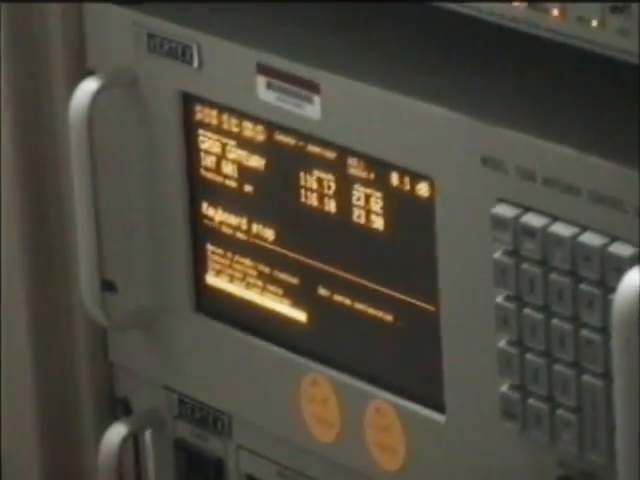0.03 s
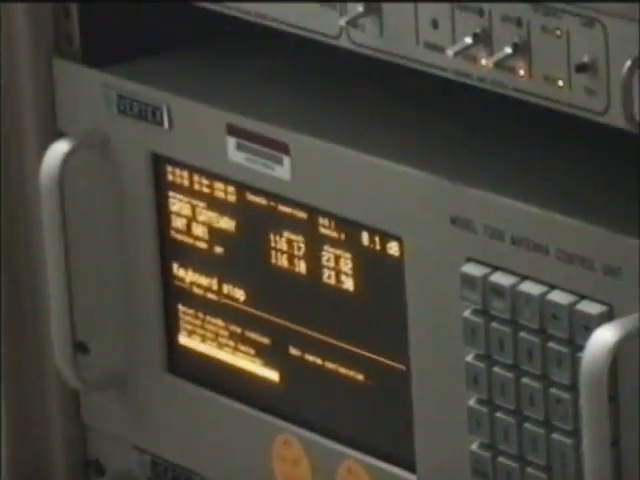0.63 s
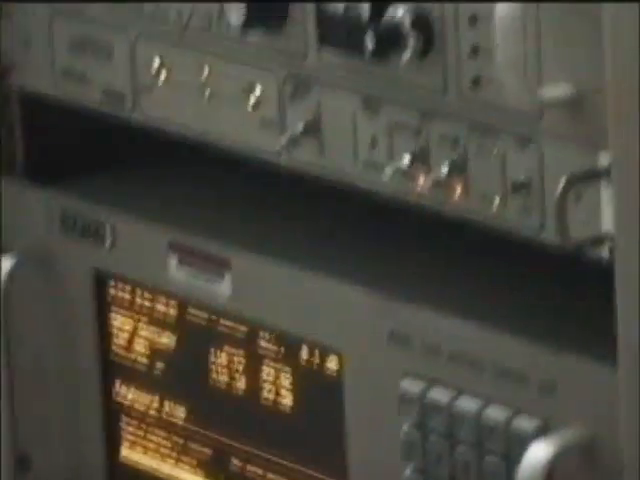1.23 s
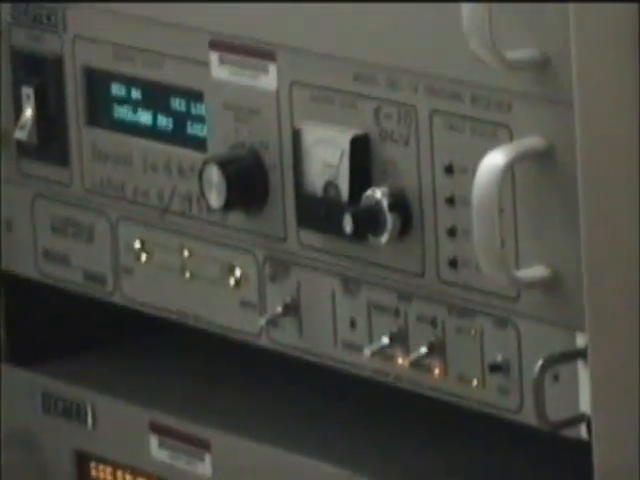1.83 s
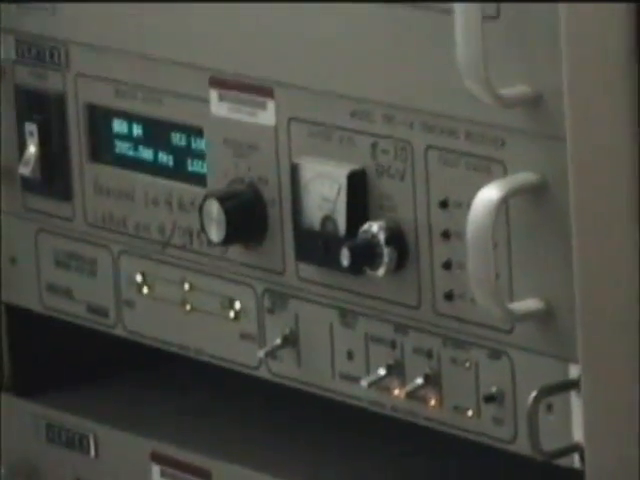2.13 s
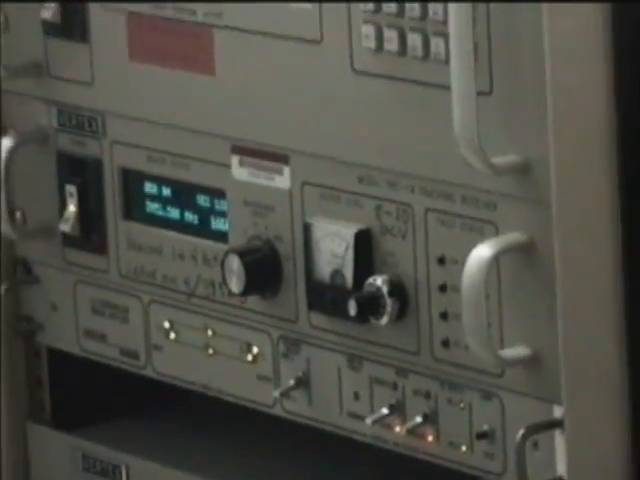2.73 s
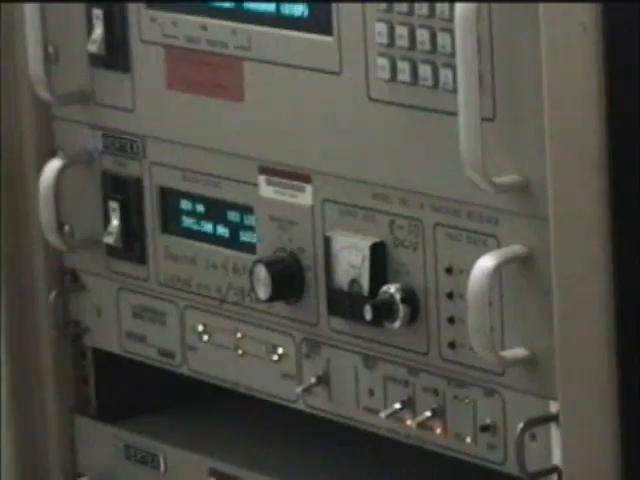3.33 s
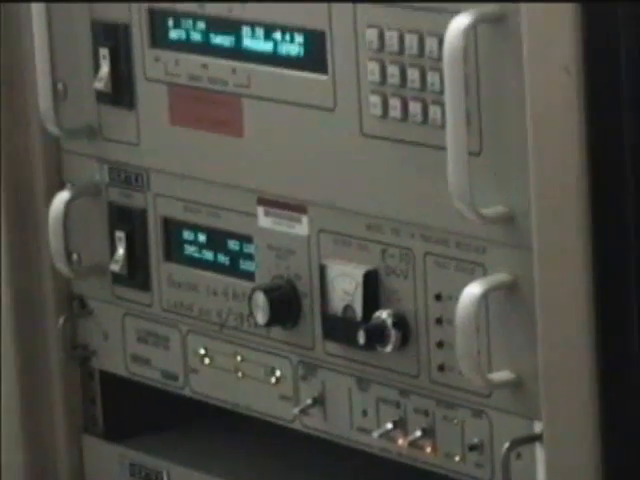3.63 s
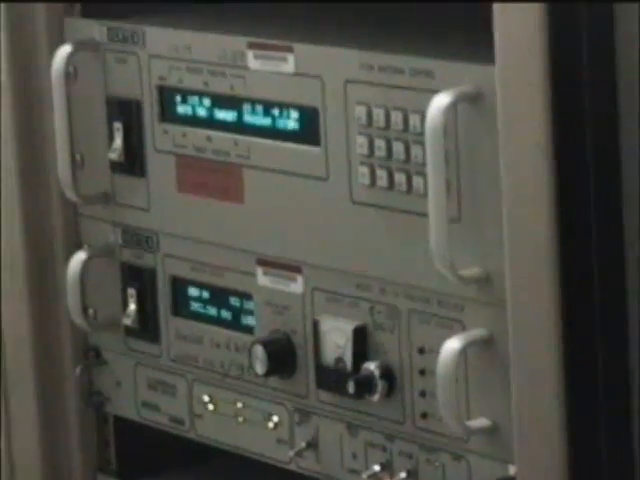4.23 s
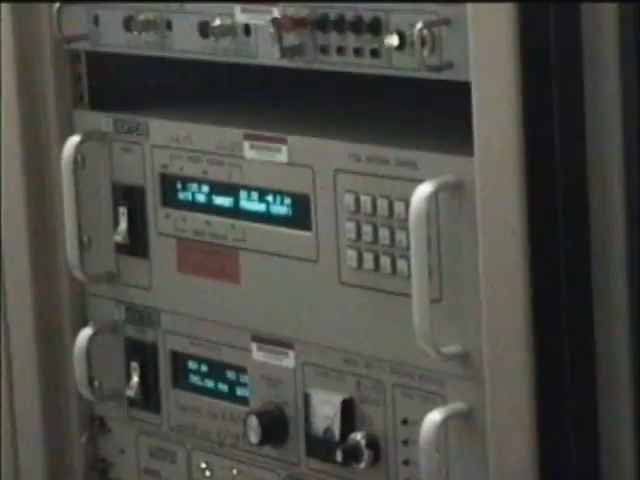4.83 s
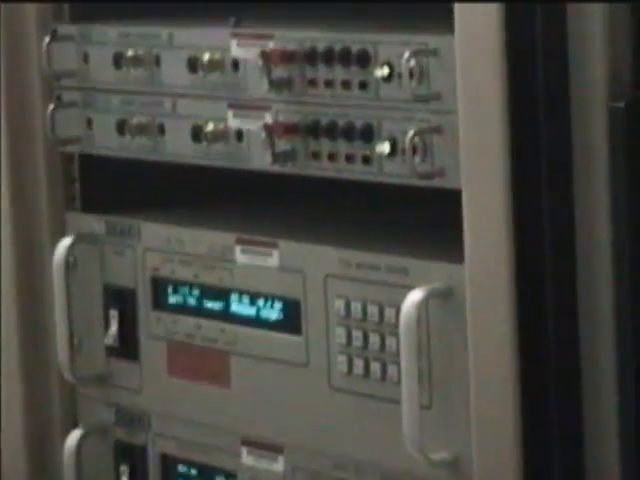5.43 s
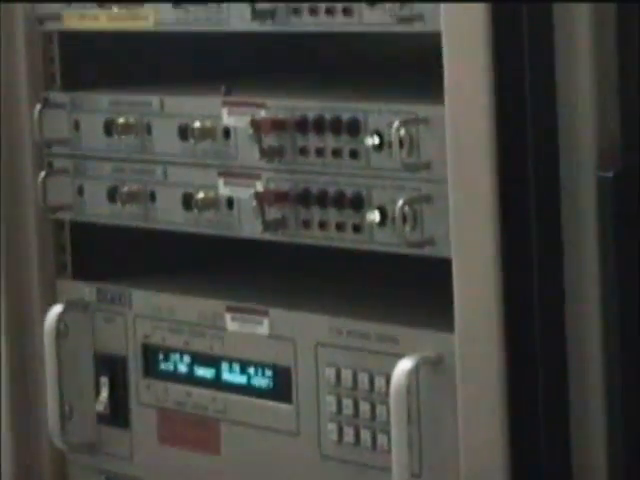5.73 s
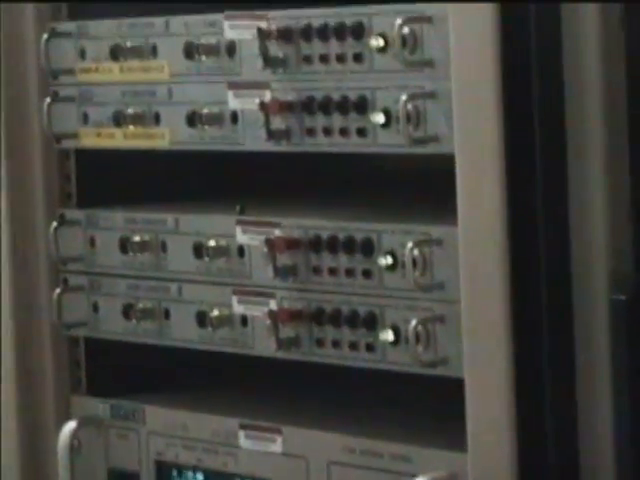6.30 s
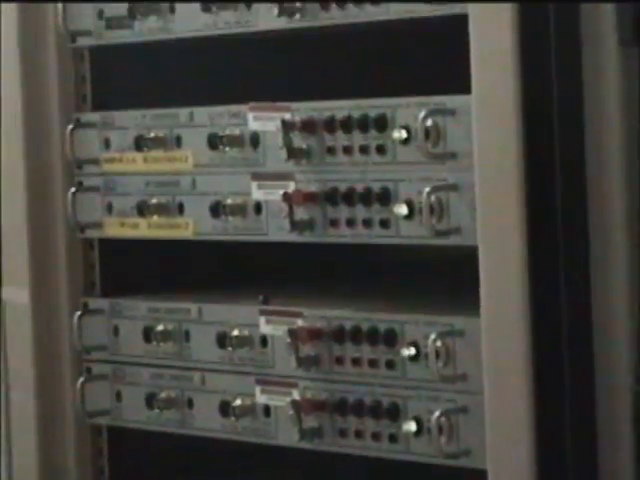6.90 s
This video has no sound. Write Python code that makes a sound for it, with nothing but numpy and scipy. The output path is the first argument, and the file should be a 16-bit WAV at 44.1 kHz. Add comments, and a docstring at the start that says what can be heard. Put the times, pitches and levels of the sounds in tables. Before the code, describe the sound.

From start to finish, about seven seconds, cooling fans in electronic equipment racks make a steady roar of air, heard in stereo from close by in a small room. Two low fan tones stand out, wavering and briefly dipping as they beat against neighbouring fans. An electrical hum and weaker, more distant fan tones blend in. The vents hiss with a slight pulse. The low roar swells briefly around 1, 1.6, 2.6 and 4 to 5 seconds. A thin, very high whistle flickers faintly on the left, clearest in the first 1.5 seconds and again after 6, with a barely audible power supply whine beside it. A fan bearing gives tiny high squeaks at about 1.3, 6.2 and 6.9 seconds. A mid-pitched fan overtone grows a little toward the end, while the overall level stays even.

```python
"""Equipment racks in a small room

A hand-held camera pans up the rack fronts, its stereo microphone close to the cooling fans.
Many fans turn at nearly the same speed: two blade tones stand out and beat with their neighbours.
Transformers hum on mains harmonics, air roars through the cabinets, hisses and whistles thinly
at the vents. Far behind, power supplies whine and a fan bearing squeaks."""
import sys
import numpy as np
from scipy.fft import rfft, irfft, next_fast_len
from scipy.io import wavfile
from scipy.ndimage import map_coordinates

SR = 44100
rng = np.random.default_rng(int(sys.argv[2]) if len(sys.argv) > 2 else 0)


def inscribe(sig):
    """Save sig as 16-bit PCM at rate SR to the path in sys.argv[1].

    A 1-D sig is mono; a 2-D sig holds one channel per row.
    Samples are clipped to [-1, 1] before scaling.
    """
    pcm = np.round(np.clip(np.atleast_2d(sig).T, -1, 1) * 32767)
    wavfile.write(sys.argv[1], SR, pcm.astype(np.int16))


N = 311346
TIME = np.arange(N) / SR

# Fans beside the low and the high near fan. Each row: offset from the blade tone in Hz, a moment
# in step at the left and at the right in seconds, relative level left and right in dB.
LOW_FAN_NEIGHBOURS = [(-1.651, .596, .033, -9.3, -13.8), (1.306, .41, .484, -26, -12),
                      (2.468, .263, .403, -34, -16), (3.679, .193, .16, -22.4, -16),
                      (4.132, .068, .22, -23.7, -13), (9.573, .024, .03, -27, -19)]
HIGH_FAN_NEIGHBOURS = [(-1.208, .375, .21, -12.5, -4.3)]
# Brief dips and lifts of each blade tone at the microphone.
# Each row: centre in seconds, half-width in seconds, change left and right in dB.
LOW_FAN_SWINGS = [(.05, .03, 2, 4), (.28, .03, -11, -6), (.38, .02, -8, 0), (.47, .05, 1, 2),
                  (.595, .03, -3, -9), (.67, .04, 2, 0), (1.06, .04, -1, -4), (1.22, .08, -1, -1.5),
                  (1.39, .03, -3, -4), (1.49, .04, 2, 2), (1.6, .03, 0, -12), (2.12, .08, 2, 2),
                  (2.3, .04, 0, -6), (2.45, .08, 1, 1), (2.89, .02, -6, 0), (3.11, .05, 3, 4),
                  (3.22, .025, 0, -10), (3.5, .03, 0, -11), (3.85, .04, 0, -4), (4.53, .06, -7, -2),
                  (4.78, .06, 2, 3), (4.96, .04, 2, 4), (5.05, .05, -3, 0), (5.35, .03, 3, 1),
                  (5.72, .022, -7, -3), (5.815, .02, -7, -5), (6.19, .04, -2, 0), (6.31, .045, -14, -12),
                  (6.58, .06, 2, 1)]
HIGH_FAN_SWINGS = [(.23, .05, 2, 2), (.37, .03, 3, 2), (.6, .04, 0, -4), (.82, .025, -3, -4),
                   (.92, .03, -9, -3), (2.44, .035, -6, 0), (3.15, .03, -2, -7), (4.09, .04, -4, 0),
                   (6.3, .07, 2, 0)]
# Both near fans speed up slightly. Each row: time in seconds, relative speed.
FAN_SPEED = [(0, .9979), (2, .9977), (3.4, 1.0002), (7.06, 1.0004)]
def near_fans(low_hz=280.45, high_hz=351.5, low_db=-29.5, high_db=-31.5):
    """Close to the microphone, two fans on one supply chop the air about a major third apart."""
    speed, = curves(FAN_SPEED)
    low_beat = beating(LOW_FAN_NEIGHBOURS) * swinging(LOW_FAN_SWINGS)
    high_beat = beating(HIGH_FAN_NEIGHBOURS) * swinging(HIGH_FAN_SWINGS)
    low = tone(low_hz * speed, pan_db=1.5, lead=-.1, drift=.00018, scatter=(.04, .06), beat=low_beat)
    high = tone(high_hz * speed, pan_db=3.5, lead=-.95, drift=.00021, scatter=(.03, .04), beat=high_beat)
    low_gain = amp(low_db + .5 * wobble(16))
    high_gain = amp(high_db + .73 * wobble(22)) * climb(rise_db=2)
    return low_gain * low + high_gain * high


def beating(neighbours, flutter=.076):
    """Like fans add to a blade tone in step and weaken it out of step; it also flutters a little."""
    gain = 1
    for offset_hz, left_s, right_s, left_db, right_db in neighbours:
        slip = 2 * np.pi * offset_hz * (TIME - np.array([[left_s], [right_s]]))
        gain = gain + amp([[left_db], [right_db]]) * np.exp(1j * slip)
    return gain + flutter * churn(14).mean(axis=0)


def swinging(swings):
    """Left and right gain of a tone that briefly drops away or swells."""
    return amp(sum(np.array([[left], [right]]) * bump(at, width) for at, width, left, right in swings))


# The low fan's overtone grows and sharpens as the camera pans.
# Each row: time in seconds, pitch in Hz, level in dB.
OVERTONE_PATH = [(0, 842, -52), (1.5, 839, -49), (2.2, 840, -52), (2.8, 845, -47.5), (3.6, 846, -49),
                 (4.5, 851, -47), (5.1, 845, -51), (5.65, 848, -45.5), (6, 848, -49), (6.22, 849, -42.5),
                 (6.5, 848, -47), (7.06, 849, -45)]
def overtone():
    """The low fan's third harmonic, unsteady in the moving air."""
    hz, db = curves(OVERTONE_PATH)
    return amp(db) * tone(hz, pan_db=-1, lead=.5, drift=.001, scatter=(.3, .3))


# Air rushing through the racks in front of the microphone. Each row: frequency in Hz, relative dB.
ROAR_SPECTRUM = [(25, -26), (45, -20), (70, -14.5), (150, -7.5), (220, -4), (310, -3.5), (400, -1.5),
                 (460, -4), (550, -5), (1000, -7.5), (1500, -12), (2100, -12.5), (2600, -18), (3000, -24),
                 (4200, -27.5), (7000, -70)]
# Cabinet and room resonances. Each row: centre in Hz, half-width in Hz, level in dB,
# left over right in dB, likeness of the two channels.
CABINET_MODES = [(57.1, 1.3, -55, 7, 0.91), (46.6, 6.3, -62, 2, .9), (84, 7.5, -51, 2, 0.99),
                 (98, 12, -57.5, 2, 0.95), (128.8, 11, -46.5, 1, 0.76), (199.4, 8.4, -50.5, 0, 0.32),
                 (251, 4.3, -46.5, 2, 0.69), (286.7, 8.5, -44, -11, 0.4), (271, 1, -50, -17, 0.31),
                 (841, 17, -46.5, -3, 0.021), (800, 12, -50.5, -5, .3), (1095, 200, -44, -5.5, 0.8),
                 (4470, 130, -55, -2, -1.1)]
def roar(level_db=-31, eddy_db=1):
    """Broad fan turbulence, with the cabinets booming unevenly in it."""
    air = amp(level_db) * rush(lambda hz: amp(along(ROAR_SPECTRUM, hz)), AIR_LIKENESS)
    boom = sum(amp(db + eddy_db * wobble(13)) * sides(pan_db) * resonance(hz, width, likeness)
               for hz, width, db, pan_db, likeness in CABINET_MODES)
    return air * sides(pan_db=-.1) + boom


def resonance(centre_hz, width_hz, likeness):
    """Turbulence ringing in one steep-sided resonance."""
    return rush(lambda hz: 1 / (1 + ((hz - centre_hz) / width_hz) ** 2), [(centre_hz, likeness)])


# Air noise in the room reaches both channels alike in the bass, unrelated in the treble.
# Each row: frequency in Hz, likeness (1 the same, 0 unrelated).
AIR_LIKENESS = [(50, .88), (110, .75), (170, .45), (300, .62), (420, .68), (700, .48), (1150, .55),
                (2000, .42), (3200, .1), (5000, 0)]
def rush(colour, likeness, lag_s=3e-5):
    """Air noise of rms 1; the racks stand a little to the right, so the left channel lags."""
    def mid_and_side(hz):
        spread = np.arccos(np.clip(along(likeness, hz), -1, 1)) / 2
        return colour(hz) * np.array([np.cos(spread), np.sin(spread)])
    mid, side = filtered(rng.standard_normal((2, N)), mid_and_side)
    left = filtered(mid + side, lambda hz: np.exp(-2j * np.pi * hz * lag_s))
    return unit(np.array([left, mid - side]))


# Hiss at the grilles facing the microphone. Each row: frequency in Hz, relative dB.
HISS_SPECTRUM = [(1800, -9), (3000, 0.5), (3700, -4.5), (4600, -3.5), (5900, -5), (7400, -4.5), (8600, -11),
                 (10300, -10.5), (11200, -12), (12500, -14), (13100, -15.5), (13800, -19)]
# Pulsing of the airflow. Each row: surges per second, time of one crest in seconds, relative depth.
AIR_SURGES = [(1.3, .17, .42), (1.65, .355, .32), (3.27, .265, .38)]
def vents(level_db=-37.5, body_surge_db=.85, top_surge_db=1.16, split_hz=7500):
    """Air hisses through the grilles in small regular surges, with some random wander and flutter."""
    surge = sum(depth * np.cos(2 * np.pi * rate * (TIME - crest)) for rate, crest, depth in AIR_SURGES)
    surge = surge + .52 * wobble(11) + .6 * wobble(45)
    air = rush(lambda hz: amp(along(HISS_SPECTRUM, hz)), AIR_LIKENESS)
    hiss = amp(level_db) * air * sides(pan_db=-.75)
    body = filtered(hiss, lambda hz: 1 / (1 + np.exp((hz - split_hz) / 500)))
    # a faster flow is brighter: the finest eddies follow a surge most
    return amp(body_surge_db * surge) * body + amp(top_surge_db * surge) * (hiss - body)


def panels(noise, ripple_db=2, spacing_hz=22):
    """Reflections between the metal fronts leave fine peaks and notches, fainter in the bass."""
    knots = rng.standard_normal(2048)
    def response(hz):
        ripple = map_coordinates(knots, [hz / spacing_hz], mode="mirror")
        return amp(ripple_db * ripple * hz / (hz + 600))
    return filtered(noise, response)


# The low roar swells and roughens the drone.
# Each row: centre in seconds, pitch in Hz, half-width in seconds, level in dB.
ROAR_SWELLS = [(.68, 225, 0.054, -39), (.86, 330, 0.05, -31), (.97, 225.4, 0.066, -33.5),
               (1.57, 236, 0.048, -32.5), (2.578, 204.6, .025, -31.5), (3.965, 230, .05, -35),
               (4.2, 214.5, 0.037, -33.5), (4.7, 220, 0.048, -36.5), (4.92, 220, .05, -38),
               (6.5, 222, 0.15, -39)]
def swells():
    """Short surges of narrow low noise, much alike in both channels."""
    eddies = churn(70)
    centred = unit(eddies + 3 * eddies.mean(axis=0))
    surges = sum(amp(db) * bump(at, width) * np.exp(2j * np.pi * hz * TIME)
                 for at, hz, width, db in ROAR_SWELLS)
    return np.sqrt(2) * np.real(centred * surges)


# Transformers and motors at different heights in the racks. Each row: multiple of the mains, level
# at mid-pan in dB, left over right in dB, left phase lead in radians, rise over the pan in dB.
HUM_HARMONICS = [(2, -48.5, 0, -1.5, -0.5), (6, -43.5, -5.5, -4.5, 3), (7, -48.5, 0, 1, 2),
                 (8, -44.7, -9, 1, 4.5), (10, -50, -2, -2.5, 0), (12, -45.7, -13, -1, 2.5),
                 (20, -59, -2, -2.5, -4)]
def mains_hum(mains_hz=60):
    """Iron cores vibrate on multiples of the mains; those high up grow as the microphone nears."""
    return sum(amp(db) * climb(rise_db) * tone(k * mains_hz, pan_db, lead, drift=.0001, scatter=(.2, .14))
               for k, db, pan_db, lead, rise_db in HUM_HARMONICS)


# Blade tones and overtones from farther off. Each row: pitch in Hz, level in dB,
# left over right in dB, left phase lead in radians.
ROOM_FAN_TONES = [ (228.5, -53, 4, 0), (247.8, -52, -5, .1), (359.3, -52, 0, 0), (478.9, -54, -3, 0),
                  (557.6, -54, -4, 2.8), (563.4, -50.5, 2, -.4), (659, -55, 3, 1.5), (780, -52, 0, 2.1),
                  (838, -54, -2, -2.2), (854, -56, -3, .5), (942, -53.5, 0, 0), (960, -54.5, 2, .5),
                  (1046, -52.5, 2, -.9), (1061, -55, -1, 1), (1079, -50.5, -1, 0), (1300, -58, 5, .3),
                  (2007, -58.5, 2, -.8), (2012, -59.5, -3, -.8)]
def room_fans():
    """Weaker fans all round the room, each at its own slightly unsteady speed."""
    return sum(amp(db) * tone(hz, pan_db, lead, drift=.001214, scatter=(.4, .4))
               for hz, db, pan_db, lead in ROOM_FAN_TONES)


# A whistle to the right of the microphone, creeping upward, strongest at the lowest and highest units. Each
# row: time in seconds, level in dB, pitch in Hz.
WHISTLE_PATH = [(0, -62, 10580), (.15, -56, 10580), (.35, -55, 10575), (.55, -59, 10580), (.8, -55, 10580),
                (1.15, -55, 10590), (1.3, -61, 10595), (1.45, -54, 10600), (1.8, -64, 10610),
                (2.3, -60, 10620), (2.7, -63, 10625), (3.8, -59, 10640), (4.8, -62, 10635),
                (5.8, -61, 10625), (6.12, -55, 10620), (6.44, -54, 10620), (6.55, -59, 10630),
                (6.7, -54.5, 10640), (7.06, -59, 10635)]
def whistle(skirt_db=-3):
    """One vent slot whistles: a narrow flickering core inside a wider airy skirt."""
    db, hz = curves(WHISTLE_PATH)
    core, skirt = churn(65), amp(skirt_db) * churn(270)
    return amp(db) * tone(hz, pan_db=-14.5, lead=0, drift=.0005, scatter=(0, 0), beat=core + skirt)


# Thin whines behind the fans. Each row: pitch in Hz, level in dB.
SUPPLY_WHINES = [(9328, -68.5), (9110, -74)]
def whines():
    """Power supplies sing faintly among shifting reflections."""
    return sum(amp(db) * tone(hz, pan_db=0, lead=0, drift=.00017, scatter=(.7, .7))
               for hz, db in SUPPLY_WHINES)


# Faint squeaks as the microphone passes. Each row: centre in seconds, pitch in Hz,
# half-width in seconds, level in dB, left over right in dB.
BEARING_SQUEAKS = [(1.255, 6170, .04, -50, 9), (6.15, 5600, .04, -56, 0), (6.91, 6170, .04, -54.5, -8)]
def squeaks():
    """A fan bearing gives brief, rough, high tones."""
    return sum(amp(db) * bump(at, width)
               * tone(hz, pan_db, lead=0, drift=.00145, scatter=(.15, .15), beat=1 + .6 * churn(130))
               for at, hz, width, db, pan_db in BEARING_SQUEAKS)


def tone(hz, pan_db, lead, drift, scatter, beat=1):
    """A drifting tone of rms 1, then panned; its reflections shift as the microphone moves."""
    phase = 2 * np.pi * np.cumsum(hz * (1 + drift * wobble(1.2))) / SR
    direct = np.exp(.5j * lead * np.array([[1], [-1]]))
    reflected = np.array([share * (wobble(2.57) + 1j * wobble(2.55)) for share in scatter])
    return sides(pan_db) * unit(np.real(beat * (direct + reflected) * np.exp(1j * phase)))


def climb(rise_db):
    """Gain of a source that comes nearer, or falls behind, as the camera pans up."""
    return amp(rise_db * (np.arange(N) / N - .5))


def churn(rate):
    """A random swirl of strength and phase in each channel, rms 1, rate knots a second."""
    return unit(np.array([wobble(rate) + 1j * wobble(rate) for channel in range(2)]))


def wobble(rate):
    """A smooth random curve, rate knots a second."""
    return map_coordinates(rng.standard_normal(2048), [TIME * rate], mode="mirror")


def bump(centre_s, half_width_s):
    """A bell curve in time, down to 1/e at the half-width."""
    return np.exp(-((TIME - centre_s) / half_width_s) ** 2)


def curves(rows):
    """One value per sample for each column after the time."""
    times, *columns = np.transpose(rows)
    return [np.interp(TIME, times, column) for column in columns]


def along(points, hz):
    """(Hz, value) points read on a log axis."""
    knots_hz, values = np.transpose(points)
    return np.interp(np.log(hz + 1), np.log(knots_hz + 1), values)


def filtered(x, response):
    """x shaped by a response given as a function of Hz."""
    size = next_fast_len(N + SR // 4)
    return irfft(rfft(x, size) * response(np.fft.rfftfreq(size, 1 / SR)), size)[..., :N]


def sides(pan_db):
    """Left and right gains; positive is to the left."""
    return amp([[pan_db / 2], [-pan_db / 2]])


def amp(db):
    """Decibels to gain."""
    return 10 ** (np.asarray(db) / 20)


def unit(x):
    """Scale to rms 1."""
    return x / np.sqrt(np.mean(np.abs(x) ** 2) + 1e-20)


def scene():
    """All the racks running steadily, heard from just in front."""
    drone = near_fans() + overtone() + room_fans() + mains_hum()
    air = panels(roar() + vents()) + swells()
    return drone + air + whistle() + whines() + squeaks()


def record(dry, top_hz=13800):
    """The camera keeps nothing above its band limit."""
    return filtered(dry, lambda hz: hz < top_hz)


dry = scene()
out = record(dry)
inscribe(out)
```